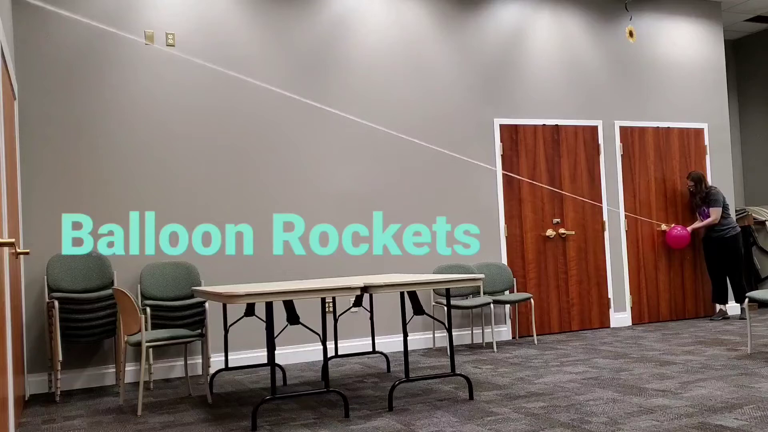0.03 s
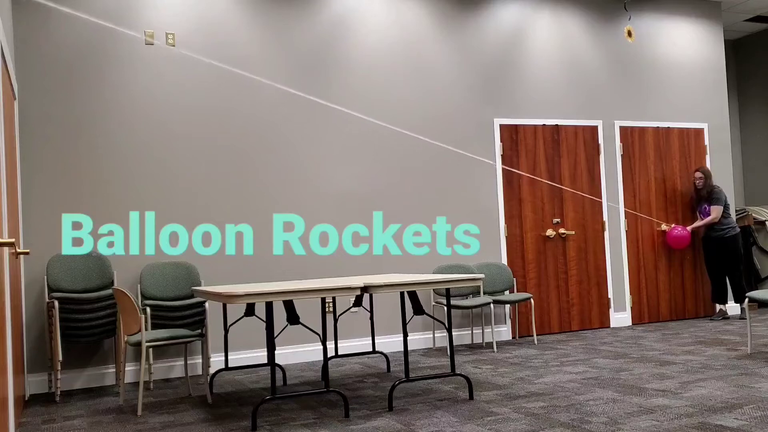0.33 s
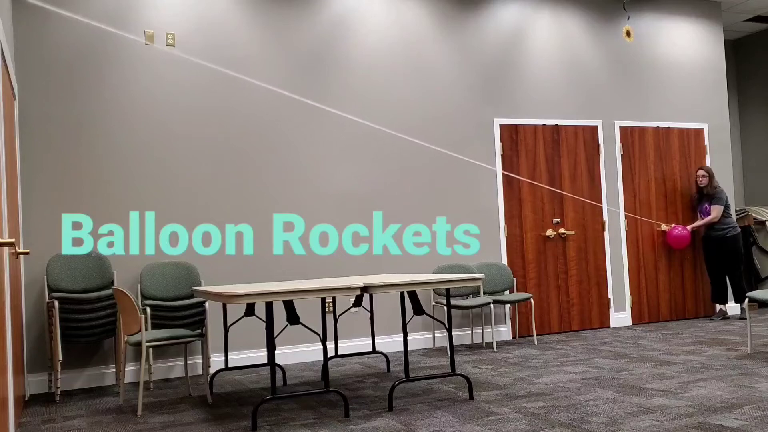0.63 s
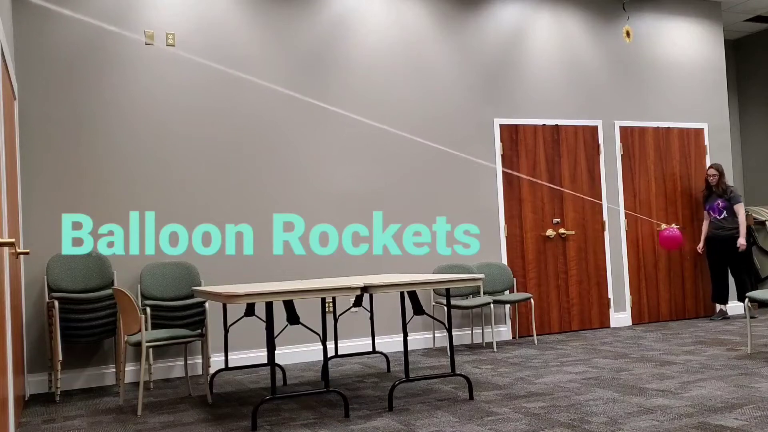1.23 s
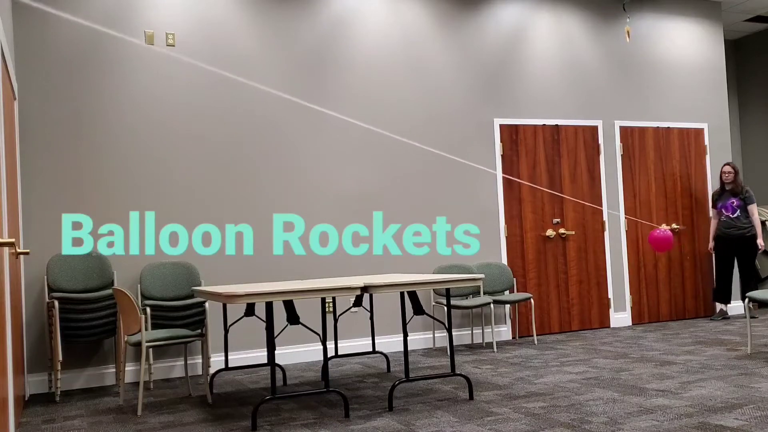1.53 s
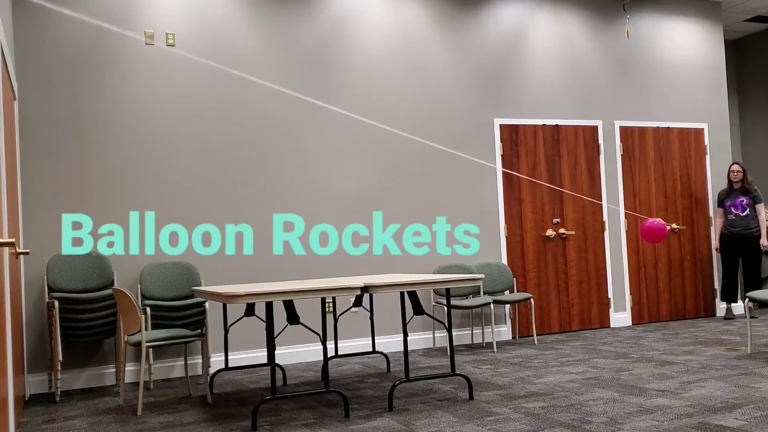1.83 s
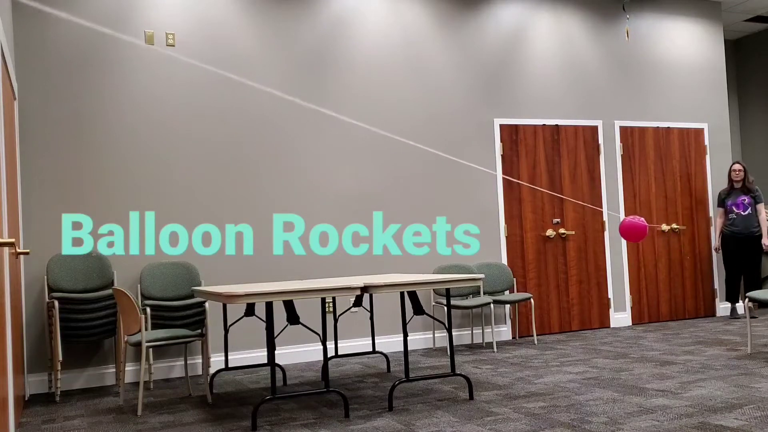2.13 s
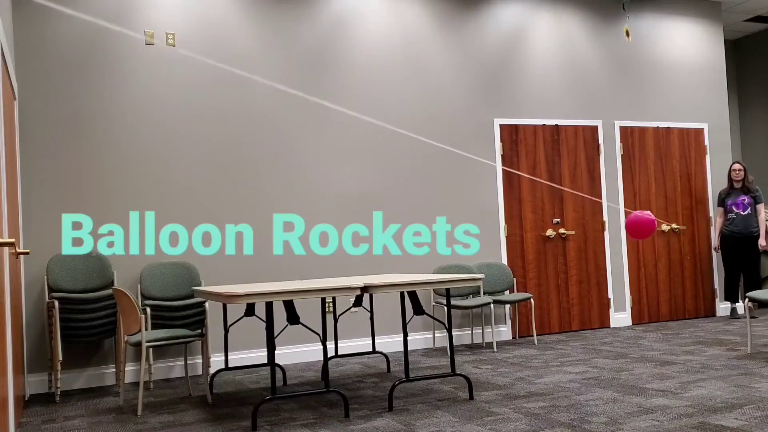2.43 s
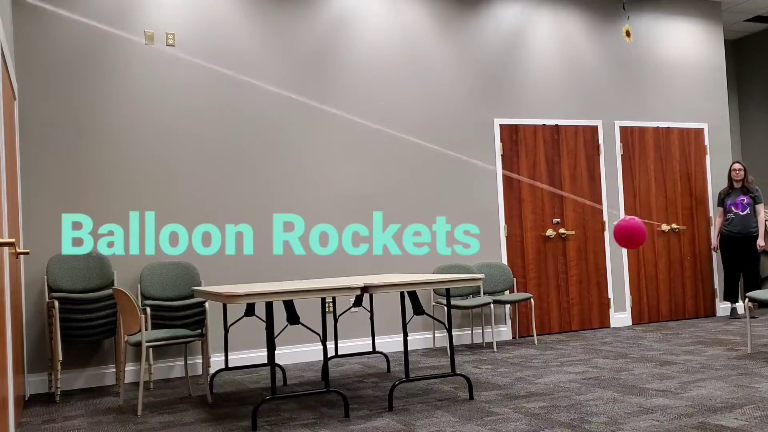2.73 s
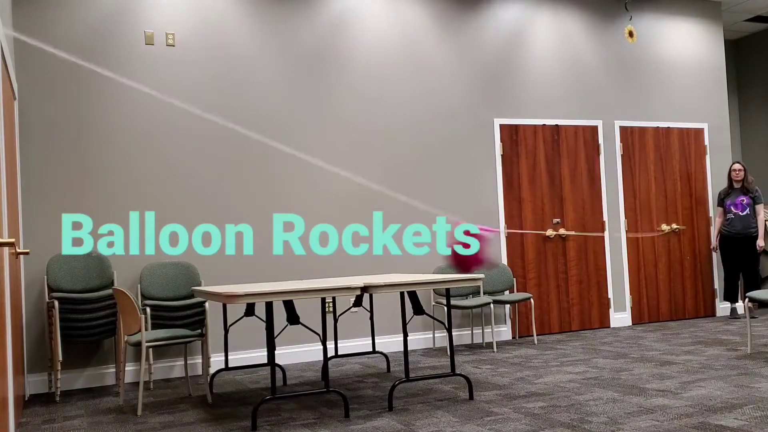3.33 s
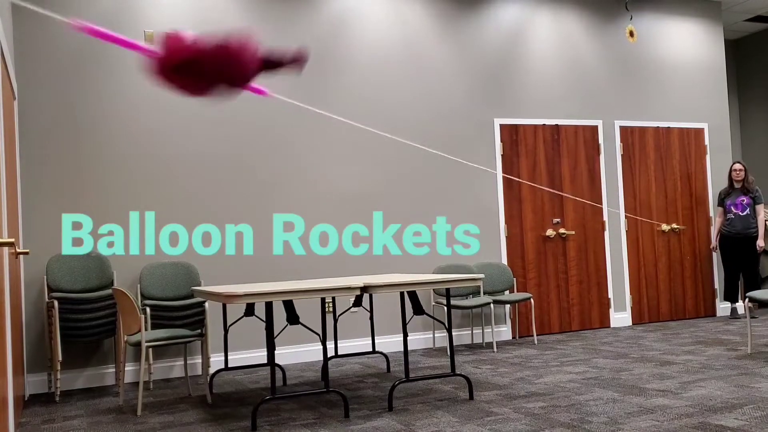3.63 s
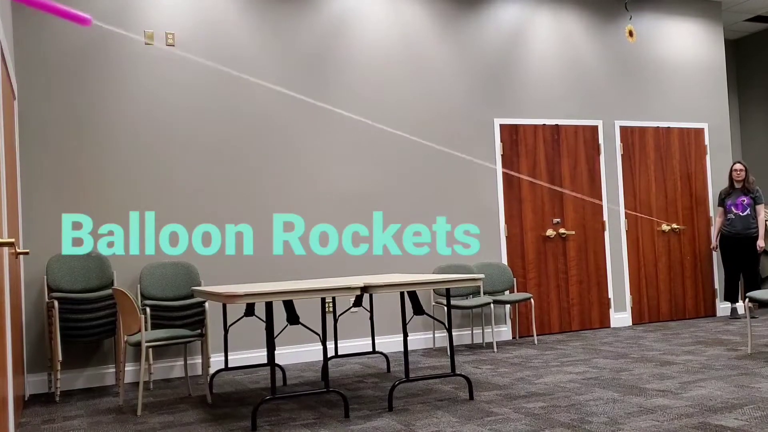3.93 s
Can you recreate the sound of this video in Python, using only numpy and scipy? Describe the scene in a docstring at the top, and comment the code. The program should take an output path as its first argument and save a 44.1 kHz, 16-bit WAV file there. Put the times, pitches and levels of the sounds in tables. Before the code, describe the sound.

A released balloon hisses across a carpeted room toward the microphone, its rubber neck fluttering over a low rumble. It ends in a louder flapping gush, then its straw scrapes along the string and ticks to a stop.

```python
"""A balloon on a string is let go at the far end of a carpeted meeting room and flies toward the mic.
Air hisses through its neck, whose resonance sinks as it empties; the jet rumbles and roars, the rubber
flutters and flaps, and the body hums while it is full. The spent balloon slides on, and the straw that
carries it ticks to a stop at the end of the string. Ventilation rumbles underneath."""
import sys
import numpy as np
from scipy import signal
from scipy.fft import rfft, irfft, next_fast_len
from scipy.io import wavfile
from scipy.ndimage import map_coordinates

SR = 44100
rng = np.random.default_rng(int(sys.argv[2]) if len(sys.argv) > 2 else 0)


def generate_wav(sig):
    """Save sig (samples, or channels by samples) to the path in sys.argv[1] as 16-bit PCM at SR."""
    pcm = np.round(np.clip(np.atleast_2d(sig).T, -1, 1) * 32767).astype(np.int16)
    wavfile.write(sys.argv[1], SR, pcm)


N = 176400

# the balloon's flight toward the mic (time [s], distance [m])
FLIGHT_PATH = [(1, 5.4), (2, 5.45), (2.75, 6.1), (3.25, 3.3), (3.5, 2.4), (3.75, 1.3)]


def amp(db):
    """Decibels to gain."""
    return 10 ** (np.asarray(db) / 20)


def unit(x):
    """Scale to rms 1."""
    return x / np.sqrt(np.mean(x ** 2) + 1e-20)


def along(points, hz):
    """Read (frequency [Hz], value) points on a log frequency axis."""
    freqs, values = np.transpose(points)
    return np.interp(np.log(hz + 1), np.log(freqs + 1), values)


def curve(rows):
    """Automation from (time [s], value) points, one value per sample."""
    return np.interp(np.arange(N) / SR, *np.transpose(rows))


def level(rows):
    """Gain from (time [s], level [dB]) points, silent before the first and after the last."""
    t = np.arange(N) / SR
    return amp(curve(rows)) * (t >= rows[0][0]) * (t <= rows[-1][0])


def wobble(rate):
    """Smooth random modulation, rate knots a second."""
    return map_coordinates(rng.standard_normal(N // 8), [np.arange(N) * rate / SR], mode="wrap")


def filtered(x, response):
    """EQ x with a gain that is a function of frequency."""
    size = next_fast_len(x.shape[-1] + SR // 2)
    return irfft(rfft(x, size) * response(np.fft.rfftfreq(size, 1 / SR)), size)[..., :x.shape[-1]]


def noise(colour):
    """Mono noise of rms 1 with the given spectrum."""
    return unit(filtered(rng.standard_normal(N), lambda hz: amp(along(colour, hz))))


def burst(colour, start, db, t60, attack_s):
    """A short decaying puff of coloured noise."""
    age = np.maximum(np.arange(N) / SR - start, 0)
    return noise(colour) * amp(db - 60 * age / t60) * (1 - np.exp(-age / attack_s))


def spread(pair):
    """Two unrelated signals become a diffuse field at the two mic ports."""
    # likeness of left and right (frequency [Hz], coherence [-1..1])
    coherence = [(100, 0.99), (250, 0.97), (400, 0.66), (600, 0.22), (900, -0.059), (2500, 0.14),
                 (3400, 0.33), (5000, 0.042), (6500, -0.19), (12000, 0.087)]
    angle = lambda hz: np.arccos(np.clip(along(coherence, hz), -1, 1)) / 2
    mid, side = filtered(pair, lambda hz: np.array([np.cos(angle(hz)), np.sin(angle(hz))]))
    return np.array([mid + side, mid - side])


def diffuse(colour):
    """Stereo noise of rms 1 that fills the room."""
    return unit(spread(np.array([noise(colour), noise(colour)])))


def delayed(x, seconds):
    """x heard after a steady or changing delay."""
    return map_coordinates(x, [np.arange(N) - seconds * SR], order=3)


def room(x):
    """Stereo reverb; each frequency dies at its own speed."""
    # decay of the carpeted room (frequency [Hz], t60 [s])
    decay = [(150, 1), (1000, 0.19), (4000, 0.49), (8000, 0.65), (14000, 0.62)]
    hz, t, spectrum = signal.stft(rng.standard_normal((2, SR // 2)), SR, nperseg=256)
    fade = amp(-60 * t / along(decay, hz)[:, None])
    tail = spread(signal.istft(spectrum * fade, SR)[1])
    tail = np.pad(tail, ((0, 0), (SR // 200, 0)))  # 5 ms pre-delay
    return signal.fftconvolve(x[None], tail / np.linalg.norm(tail[0]), axes=1)[:, :N]


def moving_room(x, count=32):
    """Each stretch of the flight excites its own reverb tail."""
    wet = np.zeros((2, N))
    for stretch in np.array_split(np.arange(N), count):
        if x[stretch].any():
            tail = room(x[stretch])[:, :N - stretch[0]]
            wet[:, stretch[0]:stretch[0] + tail.shape[1]] += tail
    return wet


def leak():
    """Air escapes through the pinched neck in a thin hiss."""
    # a small leak, then the fingers open (time [s], level [dB])
    envelope = [(.15, -110), (.17, -71.5), (.27, -67), (.31, -71.5), (.4, -110), (.9, -100), (.927, -51),
                (.95, -45), (1, -68)]
    # narrow, airy treble (frequency [Hz], level [dB])
    colour = [(2800, -18), (4200, -10), (5800, -4), (6600, 3.5), (8000, -7.5), (14000, -6.5)]
    return level(envelope) * diffuse(colour)


def ventilation(db=-50, start_s=0.16, fade_s=0.021):
    """The ventilation lays a steady bed of room tone."""
    # bass-heavy air noise (frequency [Hz], level [dB])
    colour = [(22, -38), (46, -3.5), (62, 1.5), (110, -8.5), (160, -14.5), (235, -14.5), (300, -22),
              (430, -21.5), (600, -27), (950, -30), (1300, -39.5), (1800, -48), (3000, -55), (7500, -59.5),
              (14000, -57)]
    return amp(db) * diffuse(colour) * curve([(start_s, 0), (start_s + fade_s, 1)])


def rumble(rough_db=1.5):
    """Low eddies of the jet boom in the room."""
    # strength of the eddies (time [s], level [dB])
    envelope = [(.9, -73), (.96, -48.5), (1.12, -43.5), (1.24, -40.5), (1.4, -35.5), (1.6, -39), (1.8, -41),
                (2.05, -37.5), (2.4, -39.5), (2.6, -42.5), (2.78, -40.5), (2.87, -37), (3.1, -38),
                (3.2, -35), (3.45, -37.5), (3.56, -44.5), (3.68, -70)]
    # their low boom (frequency [Hz], level [dB])
    colour = [(25, -28), (55, -5), (90, -3.5), (125, -7), (165, 4.5), (210, -1), (255, -2.5), (330, -11),
              (430, -11), (600, -32.5), (1200, -52)]
    return level(envelope) * unit(diffuse(colour) * amp(rough_db * wobble(rate=18)))


def hum():
    """The balloon hums hollowly while it is full."""
    # early swell, gone as it empties (time [s], level [dB])
    envelope = [(.92, -52), (1.13, -45), (1.22, -38), (1.42, -38), (1.58, -47), (2.1, -45), (2.6, -87)]
    # one low, hollow peak (frequency [Hz], level [dB])
    colour = [(170, -41), (228, -2.5), (258, 4.5), (305, 0.5), (345, -12), (400, -13), (480, -40)]
    return level(envelope) * diffuse(colour)


def hiss(waver_hz=110, treble_db_per_m=1.04, treble_hz=11000, rough_db=1.8, rasp_db=3.2):
    """Turbulent air through the moving resonances of the neck; the last gush has a fine rasp."""
    # raw turbulence (frequency [Hz], level [dB])
    colour = [(150, -23), (450, -1.5), (800, -5), (1200, -4), (1600, 2.5), (2250, -2), (2750, 0),
              (3150, 2.5), (3700, 3.5), (5800, -0.5), (8000, -4.5), (10500, -6), (14500, -9.5)]
    # the neck's main and upper resonances, and the hollow one of its slack lip
    # (time [s], centre [Hz], half width [Hz], boost [dB])
    main = [(.95, 4720, 220, 10), (1.15, 4950, 180, 12.5), (1.6, 4850, 200, 10.5), (1.95, 4650, 280, 9),
            (2.95, 4680, 350, 8.8), (3.22, 4300, 280, 10.5), (3.36, 4000, 280, 10.5),
            (3.47, 3700, 240, 6.5)]
    upper = [(.95, 6750, 330, 2), (2.7, 6750, 350, 2), (3.15, 6800, 350, -1), (3.42, 6650, 400, 5)]
    lip = [(2.6, 1900, 170, -14), (2.82, 1850, 170, 2), (3.05, 1650, 170, 5), (3.22, 1550, 170, -10)]
    hz, t, spectrum = signal.stft(noise(colour), SR, nperseg=512)
    waver = np.interp(t, np.arange(N) / SR, waver_hz * wobble(rate=35))  # the soft neck trembles
    power = 1
    for resonance in (main, upper, lip):
        times, *columns = np.transpose(resonance)
        centre, width, db = [np.interp(t, times, column) for column in columns]
        power = power + amp(db) ** 2 / (1 + ((hz[:, None] - centre - waver) / width) ** 2)
    # the hiss brightens as the balloon nears
    nearer_m = FLIGHT_PATH[0][1] - np.interp(t, *np.transpose(FLIGHT_PATH))
    treble = amp(treble_db_per_m * nearer_m * np.minimum(hz[:, None] / treble_hz, 1) ** 2)
    air = signal.istft(spectrum * np.sqrt(power) * treble, SR)[1][:N]
    gush = curve([(3.2, 0), (3.3, 1)])
    flicker_db = (1 - gush) * rough_db * wobble(rate=70) + gush * rasp_db * wobble(rate=320)
    return unit(air * amp(flicker_db))


def flutter(depth_db=7):
    """The rubber neck flaps unevenly and chops the air into puffs."""
    # flutter against the hiss, strongest at launch and at the end (time [s], level [dB])
    balance = [(.95, -14), (1, -6.5), (1.12, -15), (2.4, -12), (2.8, -13), (3.2, -15), (3.33, -7),
               (3.48, -6)]
    # upper-midrange bite (frequency [Hz], level [dB])
    colour = [(200, -20), (500, -4), (1150, -4), (1600, -1), (2300, 6), (2800, 11.5), (3200, -2),
              (3650, -15.5), (4500, -47), (12000, -30)]
    return amp(curve(balance)) * unit(noise(colour) * amp(depth_db * wobble(rate=140)))


def jet(direct_db=-2.5, send_db=1, send_db_per_m=2.5, port_lag_s=.000136, sound_m_per_s=343):
    """Hiss, flutter and flaps, with wall and ceiling echoes that shift as the balloon approaches."""
    # hiss and flutter together (time [s], level [dB])
    envelope = [(.922, -60), (.945, -40.5), (.975, -40.5), (1.05, -41), (1.11, -44.5), (1.22, -42),
                (1.53, -44), (1.6, -40.5), (1.92, -45.5), (2.04, -40.5), (2.39, -47), (2.445, -40.5),
                (2.62, -47), (2.68, -41.5), (2.8, -41.5), (2.88, -43), (2.97, -38.5), (3.06, -40),
                (3.15, -40), (3.275, -35), (3.31, -32), (3.465, -34.5), (3.49, -53), (3.6, -83)]
    # surfaces beside the flight (extra sideways path [m], echo [dB])
    surfaces = [(1.3, -14), (2.6, -3)]
    air = level(envelope) * (hiss() + flutter()) + flaps()
    metres = curve(FLIGHT_PATH)
    echoes = sum(amp(db) * delayed(air, (np.hypot(metres, side) - metres) / sound_m_per_s)
                 for side, db in surfaces)
    near = air + echoes
    near = near * np.std(air) / np.std(near)  # the echoes add colour, not level
    ports = np.array([delayed(near, port_lag_s), near])
    send = amp(send_db + send_db_per_m * (metres - metres[0]))  # drier when closer
    return ports * amp(direct_db) + moving_room(air * send)


def roar(rough_db=2.2):
    """The spreading jet roars softly and unevenly in the midrange."""
    # growing as the balloon nears (time [s], level [dB])
    envelope = [(.94, -81), (1, -53), (1.12, -59), (1.22, -50), (1.52, -50), (1.7, -47.5), (2.1, -49),
                (2.6, -52.5), (2.8, -48.5), (2.89, -48.5), (2.98, -46.5), (3.08, -43), (3.23, -49.5),
                (3.34, -39), (3.47, -43.5), (3.53, -55), (3.65, -75)]
    # breathy body (frequency [Hz], level [dB])
    colour = [(250, -9.5), (420, 0.5), (560, -2.5), (780, -2), (1000, -4.5), (1300, -7), (1750, -13.5),
              (2300, -17), (4000, -35)]
    return level(envelope) * unit(diffuse(colour) * amp(rough_db * wobble(rate=50)))


def flaps():
    """The slack neck gives single flaps as the air runs out."""
    # each flap (time [s], level [dB], t60 [s])
    hits = [(3.022, -33, .045), (3.064, -34, .045), (3.333, -27, .025), (3.372, -28, .02),
            (3.471, -20, .026), (3.507, -31, .022), (3.76, -44, .04), (3.791, -46, .025)]
    # rubbery midrange slap (frequency [Hz], level [dB])
    colour = [(300, -16), (1000, -9), (1550, -1), (2000, 3), (2500, -2), (3300, -17), (12000, -32)]
    return sum(burst(colour, start, db, t60, attack_s=0.0041) for start, db, t60 in hits)


def slide(grain_db=2.4):
    """The straw scrapes along the string as the spent balloon coasts."""
    # strength of the scrape (time [s], level [dB])
    envelope = [(3.3, -66), (3.55, -46), (3.7, -54.5), (3.78, -55.5), (3.82, -61.5), (3.89, -51),
                (3.96, -58), (4, -67)]
    # friction noise (frequency [Hz], level [dB])
    colour = [(150, 11), (500, -2), (1300, 0), (2800, -8), (4000, -1.5), (5500, -4), (14000, -11)]
    return level(envelope) * unit(diffuse(colour) * amp(grain_db * wobble(rate=330)))


def tick(start, db, t60, top_hz, attack_s=.0004, crack_db=2):
    """One contact: a crack and the brief ring of the straw, duller when the contact is soft."""
    # modes of the straw (frequency [Hz], level [dB])
    modes = [(2300, -9), (4250, -8), (9100, -9)]
    # bright crack of the contact (frequency [Hz], level [dB])
    colour = [(200, -6.5), (6500, -1), (10000, 3), (14000, 4)]
    age = np.maximum(np.arange(N) / SR - start, 0)
    loss_db = lambda hz: 20 * np.log10(np.hypot(1, (hz / top_hz) ** 2))
    ring = sum((-1) ** k * amp(mode_db - loss_db(hz)) * np.sin(2 * np.pi * hz * age)
               for k, (hz, mode_db) in enumerate(modes))
    dulled = [(hz, band_db - loss_db(hz)) for hz, band_db in colour]
    crack = burst(dulled, start, db + crack_db, t60, attack_s)
    return ring * amp(db - 60 * age / t60) * (1 - np.exp(-age / attack_s)) + crack


def end_stop(left_db=3, send_db=-3.5):
    """Straw and rubber tick against the end of the string, left of centre."""
    # each contact (time [s], level [dB], t60 [s], low-pass [Hz])
    contacts = [(3.841, -43, 0.0097, 5600), (3.8751, -29.5, 0.012, 15100), (3.899, -45, 0.01, 2600),
                (3.948, -48.5, 0.032, 1060)]
    ticks = sum(tick(*contact) for contact in contacts)
    return ticks * amp([[left_db], [-left_db]]) + amp(send_db) * room(ticks)


def scene():
    """The stereo mix: flight, arrival and room tone, with the balloon's low end leaning left."""
    rush = jet() + roar()
    low_end = (rumble() + hum()) * amp([[.5], [-.5]])
    return rush + low_end + end_stop() + slide() + ventilation() + leak()


def record(dry):
    """A steep low-pass takes off the very top."""
    top_hz, edge_hz = 14700, 70
    return filtered(dry, lambda hz: .5 - .5 * np.tanh((hz - top_hz) / edge_hz))


dry = scene()
out = record(dry)
generate_wav(out)
```